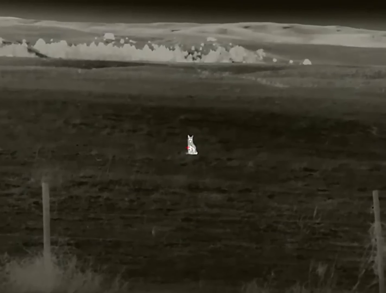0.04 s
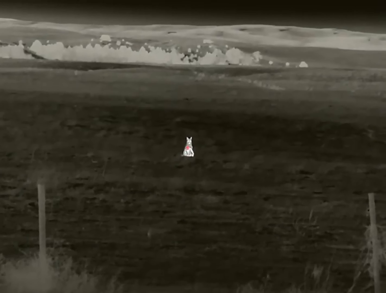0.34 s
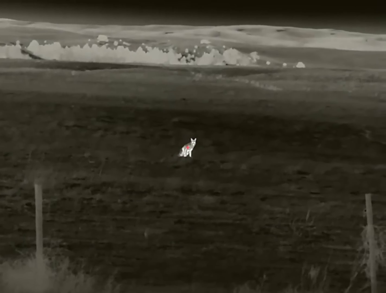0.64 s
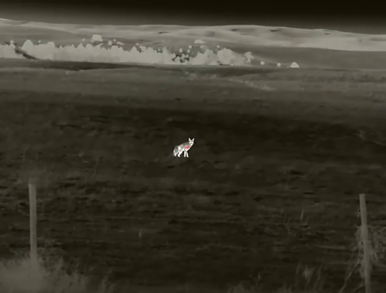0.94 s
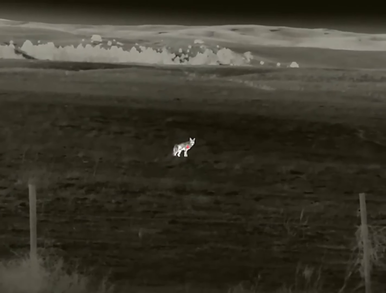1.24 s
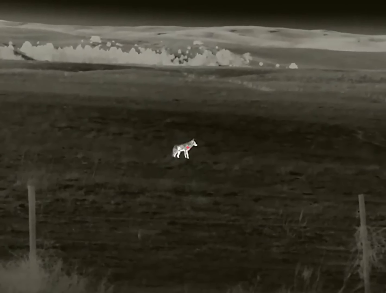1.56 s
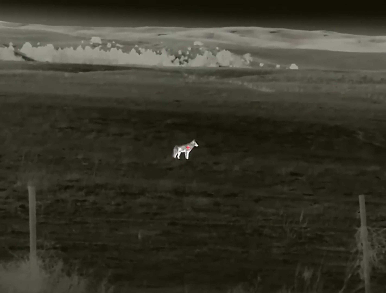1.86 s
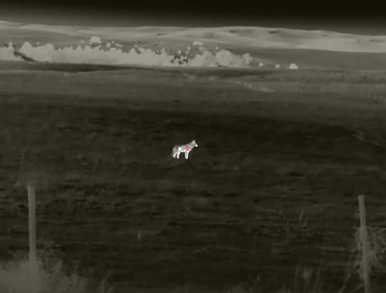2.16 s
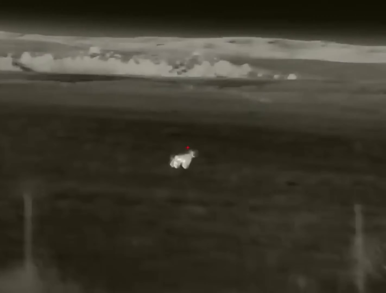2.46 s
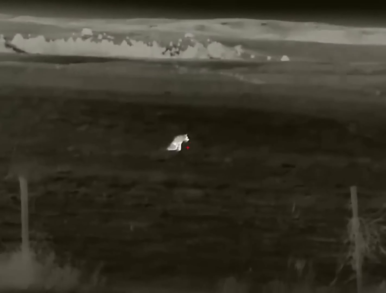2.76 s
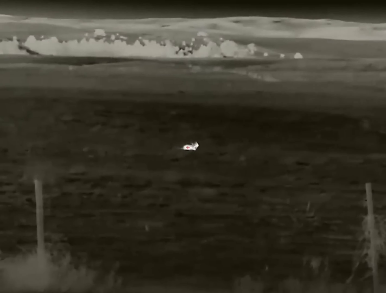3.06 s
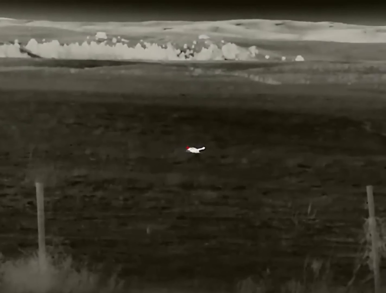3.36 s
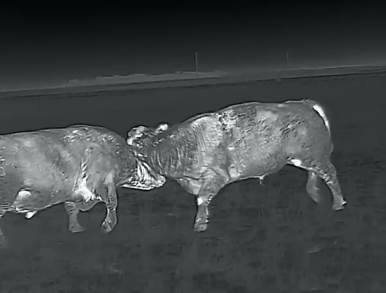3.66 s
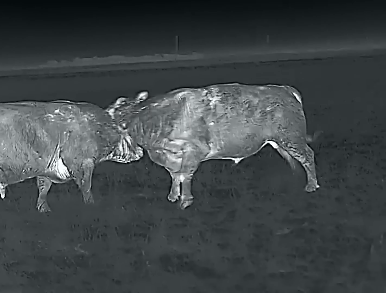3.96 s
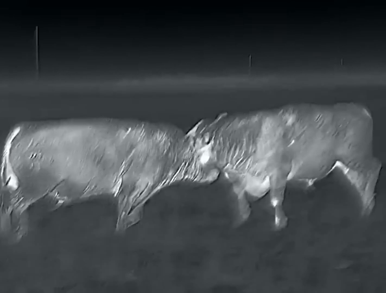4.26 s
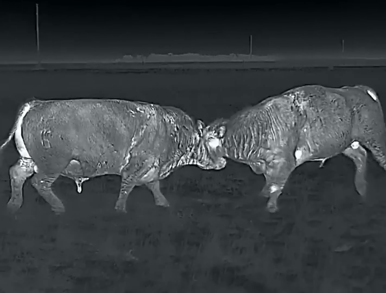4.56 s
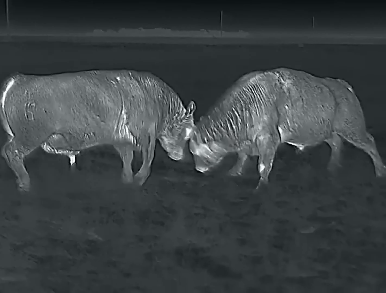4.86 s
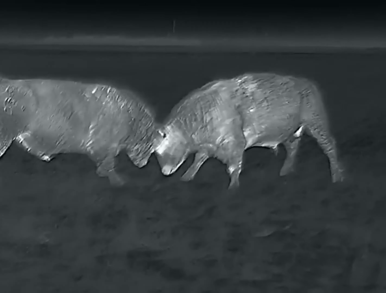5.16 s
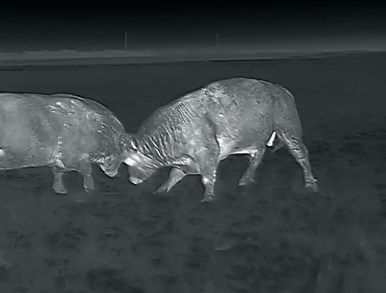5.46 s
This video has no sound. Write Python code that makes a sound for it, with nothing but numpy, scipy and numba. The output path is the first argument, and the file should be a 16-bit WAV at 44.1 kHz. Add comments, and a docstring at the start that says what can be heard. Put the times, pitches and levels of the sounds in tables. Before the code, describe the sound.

Faint crickets in a field, one loud rifle crack with a quieter second smack, then a bull bellowing in a long climbing call.

```python
"""Crickets chirr and a lone insect ticks over the low rumble of open farmland at night.
A rifle fires close by, a thud and a burst of gas, and its report rolls over the field. A third of a
second later the smack of the bullet comes back, with a few echoes. Grass rustles, a thin hiss comes up
and a bull bellows, its vocal folds pulsing through the resonances of its throat: a long rising call
that turns hoarse, breaks into a high hoot and climbs again. An insect trills briefly behind it."""
import sys
import numpy as np
from scipy import signal
from scipy.fft import rfft, irfft
from scipy.io import wavfile
from scipy.ndimage import uniform_filter1d, map_coordinates
from numba import njit

SR = 44100
rng = np.random.default_rng(int(sys.argv[2]) if len(sys.argv) > 2 else 0)


def wav_out(sig):
    """Save sig, one row per channel (or a flat mono array), as 16-bit PCM at SR to the path in sys.argv[1]."""
    wavfile.write(sys.argv[1], SR, np.round(np.clip(np.atleast_2d(sig).T, -1, 1) * 32767).astype(np.int16))


N = 247401
T = np.arange(N) / SR
SHOT_S, SMACK_S = 2.4112, 2.7267


def undb(db):
    return 10 ** (np.asarray(db) / 20)


def unit(x):
    """Scale to rms 1."""
    return x / np.sqrt(np.mean(x ** 2) + 1e-20)


def curves(table):
    """Each column of a breakpoint table as an automation curve."""
    s, *columns = np.transpose(table)
    return [np.interp(T, s, c) for c in columns]


def gate(start, end, rise, fall):
    """1 from start to end, with a ramp before and after."""
    return np.clip(1 + np.minimum((T - start) / rise, (end - T) / fall), 0, 1)


def sounding(table):
    """A gate held open over the table's time span."""
    return gate(table[0][0], table[-1][0], rise=.022, fall=.022)


def since(start):
    """Seconds gone by since start, 0 before it."""
    return np.maximum(T - start, 0)


def decay(start, t60, hold=0):
    """Silent until start, level during hold, then dying away."""
    return (T >= start) * np.exp(-np.log(1000) * since(start + hold) / t60)


def swell(peak, width):
    """A bell-shaped fade in and out."""
    return np.exp(-.5 * ((T - peak) / width) ** 2)


def walk(rate):
    """Smooth random modulation with rms 1, changing about rate times a second."""
    count = int(N / SR * rate) + 4
    return unit(map_coordinates(rng.standard_normal(count), [T * rate + 1], order=2))


def butter(x, hz, kind):
    return signal.sosfilt(signal.butter(2, hz, kind, fs=SR, output="sos"), x)


def colour(x, points, size=8192):
    """Minimum-phase EQ through points of (frequency [Hz], gain [dB])."""
    hz, db = np.transpose(points)
    bins_hz = np.fft.rfftfreq(size, 1 / SR)
    log_gain = np.log(undb(np.interp(np.log(bins_hz + 1), np.log(hz), db)))
    cepstrum = irfft(log_gain)[:size // 2]
    cepstrum[1:] *= 2
    response = irfft(np.exp(rfft(cepstrum, size)))[:size // 2]
    return signal.fftconvolve(x, response)[:N]


def wide(points, side_db, envelope=1):
    """Mid/side stereo noise, enveloped and then coloured by an EQ scaled to unity power."""
    mid_noise, side_noise = rng.standard_normal((2, N))
    gain = 1 / np.sqrt(np.sum(colour(signal.unit_impulse(N), points) ** 2))
    side = undb(side_db) * colour(side_noise * envelope, points)
    return gain * (colour(mid_noise * envelope, points) + np.array([side, -side]))


# cricket beds: (start [s], end [s], centre [Hz], half-width [Hz], level [dB])
CRICKET_BANDS = [(0, 3.95, 2095, 240.4, -67), (0, 3.1, 2600, 260.2, -86.5), (0, 3.97, 5290, 340, -77.5)]


def crickets():
    """Many crickets blend into narrow shimmering bands."""
    out = 0
    for start, end, hz, width, db in CRICKET_BANDS:
        steps = (-4, -2, -1, -.5, 0, .5, 1, 2, 4)
        band = [(hz + width * k, -min(12 * k * k, 20 * abs(k))) for k in steps]
        chirr = wide(band, side_db=-12) * undb(db + .3985 * walk(30))
        out += chirr * gate(start, end, rise=.13, fall=.04)
    return out


# bright ring of a tick: (frequency [Hz], gain [dB])
TICK_EQ = [(5500, -40), (7500, -13), (8800, -1.5), (10500, -3), (12000, -17), (15000, -26)]


def ticking_insect():
    """A lone insect speeds up to about six ticks a second, then fades under the bull."""
    gaps_s = np.maximum(.216 - .0047 * np.arange(20), .156)
    ticks = sum(decay(s, t60=.005) + .16 * decay(s, t60=.088) for s in np.cumsum([.146, *gaps_s]))
    return wide(TICK_EQ, side_db=-4, envelope=ticks * undb(-65 - 28 * since(3.28)))


# bass-heavy night ambience: (frequency [Hz], gain [dB])
NIGHT_EQ = [(25, -23), (55, -11), (90, -6), (120, 3.5), (165, -7.5), (300, -12.5), (650, -14.5),
            (1400, -24), (2700, -24.5), (3600, -29), (4500, -23), (6000, -31), (7500, -37.5), (15000, -42)]


def night_air():
    """A low far-off rumble over the field, barely wavering."""
    return wide(NIGHT_EQ, side_db=-10) * undb(-71 + .38 * walk(6.6))


def crack(start, hz, t60):
    """A pressure swing that builds within a cycle and rings out within a few."""
    cycles = hz * since(start)
    return np.sin(2 * np.pi * cycles) * (1 - np.exp(-cycles / .12)) * decay(start, t60)


# full-range muzzle blast: (frequency [Hz], gain [dB])
BLAST_EQ = [(30, -10.5), (100, -0.5), (200, -6), (370, 0.5), (520, -2.5), (750, -9), (1100, -6), (1600, -3),
            (2600, -3.5), (3500, -0.5), (6500, 0), (10000, -3.5), (13000, -0.5), (15500, -8)]


def rifle():
    """A thud and a burst of muzzle gas whose bass dies first; it reaches the left ear a moment early."""
    attack = np.minimum(since(SHOT_S) / .0008, 1)
    treble = wide(BLAST_EQ, side_db=-2.5, envelope=attack * decay(SHOT_S, t60=.14, hold=.018))
    treble = butter(butter(treble, 420, "high"), 420, "high")
    bass = wide(BLAST_EQ, side_db=-5.5, envelope=attack * decay(SHOT_S, t60=.046, hold=.014))
    gas = undb(-7) * treble + undb(-1.5) * butter(bass, 670, "low")
    thud = undb(-18.5) * crack(SHOT_S + .001, hz=104, t60=.04994)
    left, right = butter(gas + thud, 40, "high")
    pan_db, lag_samples = 2.1, 3
    return np.array([left * undb(pan_db / 2), np.roll(right, lag_samples) * undb(-pan_db / 2)])


# bright tail of the report: (frequency [Hz], gain [dB])
FIELD_EQ = [(40, -23.5), (160, -13.5), (500, -23), (1400, -8.5), (2200, -4), (3700, -5.5), (5200, -0.5),
            (8000, -11), (15000, -29)]
# low end of the report, back from the hills: (frequency [Hz], gain [dB])
HILLS_EQ = [(30, -19.5), (70, -3.5), (200, 0), (300, -10.5), (500, -21.5), (2000, -45)]
# returns from the hills: (time [s], level [dB], t60 [s])
HILL_RETURNS = [(2.45, -66, 7), (2.859, -60.5, 0.53), (3.07, -66, 0.46)]


def rolling_report():
    """Near ground, open field and far hills scatter the report back, duller from further away."""
    start = SHOT_S + .0078
    field_edge_s = 2.85  # the tail dies faster from here
    ground = undb(-28) * decay(start, t60=.4)
    field = undb(-45) * decay(start, t60=2.3) * decay(start, t60=.73, hold=field_edge_s - start)
    bright = wide(FIELD_EQ, side_db=-9, envelope=np.hypot(ground, field))
    dull = signal.sosfiltfilt(signal.butter(2, 6000, fs=SR, output="sos"), bright)
    far = np.minimum(since(SHOT_S) / .54, 1) ** 2
    returns = sum(undb(db) * decay(s, t60) for s, db, t60 in HILL_RETURNS)
    hills = wide(HILLS_EQ, side_db=-10.5, envelope=returns)
    return (1 - far) * bright + far * dull + hills


# midrange bite of the smack's noise and its echoes: (frequency [Hz], gain [dB])
SMACK_EQ = [(100, -15), (400, -17), (800, -7.5), (1400, 0), (2600, -1), (4000, -10.5), (6500, -28),
            (10000, -32), (15000, -52)]


def bullet():
    """The bullet lands with a sharp smack, a hollow thump and a spray of noise."""
    smack = undb(-9.5) * crack(SMACK_S, hz=1710, t60=.0047)
    smack += undb(-15) * crack(SMACK_S, hz=3700, t60=.0022)
    thump = undb(-15.5) * crack(SMACK_S + .0016, hz=182, t60=.024)
    spray = wide(SMACK_EQ, side_db=-3.5, envelope=undb(-31) * decay(SMACK_S, t60=.032))
    return butter(butter(smack, 7900, "low") + thump, 95, "high") + spray


# slapbacks of the smack: (time [s], level [dB], low-pass cutoff [Hz])
SLAPBACKS = [(2.7429, -30.5, 9000), (2.7945, -35, 9000), (2.8237, -39, 9000), (2.827, -33.5, 12000),
             (2.8534, -36, 1900), (3.036, -48, 2000), (3.062, -53.5, 4000)]


def bullet_echoes():
    """The smack comes back in short bursts, each with a diffuse tail, and they blur into a wash."""
    out = wide(SMACK_EQ, side_db=-4, envelope=undb(-48.5) * swell(2.845, width=.026))  # the wash
    for s, db, cutoff_hz in SLAPBACKS:
        burst = decay(s, t60=.02) + undb(-14.5) * decay(s, t60=.39)
        out += undb(db) * butter(wide(SMACK_EQ, side_db=-3, envelope=burst), cutoff_hz, "low")
    return out


# airy top layer: (frequency [Hz], gain [dB])
HISS_EQ = [(1400, -22), (2400, -1), (3000, -4.5), (3500, -10.5), (4300, -9), (5500, -12), (7600, -15.5),
           (10500, -17.5), (13500, -16), (15500, -29)]


def hiss():
    """A thin hiss fades in just ahead of the bull and creeps up in level."""
    start = 2.95
    bed = wide(HISS_EQ, side_db=-5.5) * undb(-74 + 1.9 * since(start))
    return bed * gate(start, T[-1], rise=.11, fall=1)


# crisp sheen of the grass: (frequency [Hz], gain [dB])
GRASS_EQ = [(4000, -31), (7500, -11), (9000, -2), (11500, 0), (13500, -7.5), (15500, -22)]
# brief rustles: (time [s], level [dB], width [s])
SWISHES = [(2.991, -72, 0.013), (3.05, -75.5, .03), (4.491, -78, 0.032)]


def grass():
    """A few soft swishes, each swelling and fading."""
    swishes = sum(undb(db) * swell(s, width) for s, db, width in SWISHES)
    return wide(GRASS_EQ, side_db=-4, envelope=swishes)


# air rushing through the throat: (frequency [Hz], gain [dB])
RASP_EQ = [(60, -30.5), (130, -4.5), (300, 6), (550, 4.5), (750, 2.5), (1150, 2.5), (1420, -4),
           (1650, -6.5), (2000, -12), (2600, -29.5), (3000, -18.5), (3600, -35), (7700, -28), (9000, -46.5)]


def vocal_folds(hz, rough, jitter, shimmer):
    """One pulse and one puff of air a cycle; roughness unsettles the timing and size of the pulses."""
    rough = np.clip(rough, 0, 1)
    cycles = np.cumsum(hz * (1 + jitter * (rough + .035) * walk(140))) / SR
    at = np.interp(np.arange(1, int(cycles[-1]) + 1), cycles, np.arange(N))
    index = np.minimum(at.astype(int), N - 2)
    size = np.sqrt(SR / hz[index]) * (1 + shimmer * rough[index] * rng.standard_normal(N)[:len(at)])
    pulses = np.zeros(N)
    pulses[index], pulses[index + 1] = size * (1 - at % 1), size * (at % 1)  # split over two samples
    puffs = np.exp(-(cycles % 1)) * rng.standard_normal(N)
    return pulses, rough * unit(colour(puffs, RASP_EQ))


def roughness(spells, clear=.09):
    """A clear voice that turns hoarse in spells."""
    return clear + sum(amount * gate(s, s, rise, fall) for s, rise, fall, amount in spells)


def even(sound):
    """Ride the rms to 1, whichever overtones fall on the throat's resonances."""
    return sound / np.sqrt(np.abs(uniform_filter1d(sound ** 2, SR // 20)) + 1e-12)


# pitch curve of the bellow: (time [s], pitch [Hz])
BELLOW_PITCH = [(3.25, 79.55), (3.524, 101), (3.656, 111.3), (3.722, 112.5), (3.968, 127.9), (4.224, 133.7),
                (4.688, 134.2), (4.854, 137.4), (4.95, 128.1)]
# its volume curve: (time [s], level [dB])
BELLOW_LEVEL = [(3.24, -67), (3.42, -55), (3.616, -52), (3.654, -46), (3.948, -38.5), (4.258, -39),
                (4.43, -36), (4.854, -37.5), (4.95, -42.5)]
# its hoarse spells: (peak time [s], rise [s], fall [s], added roughness [0-1])
BELLOW_GRIT = [(3.25, .05, 0.68, 0.24), (3.9, 0.076, 0.66, 0.55), (4.95, 0.26, .1, 0.55)]
# formants with the mouth shut, half open and wide: (frequency [Hz], gain [dB])
SHUT_EQ = [(60, -39), (100, -8), (190, 4), (300, 0.5), (480, 5.5), (650, -4), (850, -10), (1000, 3.5),
           (1200, -9), (1450, 3.5), (1650, -23), (2500, -35), (5000, -48)]
HALF_OPEN_EQ = [(70, -40), (115, -12), (230, -7), (350, -1), (470, 4.5), (580, -12), (930, -12.5),
                (1200, -12), (1380, -33), (1630, -5.5), (1780, -28), (2600, -48), (3000, -34), (3600, -51)]
OPEN_EQ = [(70, -39), (132, -11), (265, -5.5), (400, -4.5), (535, 5), (660, -17), (800, -10), (940, -24.5),
           (1200, -15), (1380, -23.5), (1610, -19), (1750, -31), (1880, -29.5), (2200, -34), (2500, -47)]


def bellow():
    """The long call: the mouth passes from shut through half open to wide as the pitch rises."""
    hz, = curves(BELLOW_PITCH)
    db, = curves(BELLOW_LEVEL)
    shut_hz, open_hz, jaw_share = 91, 136.1, .19
    jaw_drop = gate(3.655, T[-1], rise=.043, fall=1)  # part of the opening comes at once
    gradual = (hz - shut_hz) / (open_hz - shut_hz)
    opening = np.clip((1 - jaw_share) * gradual + jaw_share * jaw_drop, 0, 1)
    pulses, rasp = vocal_folds(hz, roughness(BELLOW_GRIT), jitter=.015, shimmer=.2)
    shapes = (0, SHUT_EQ), (.5, HALF_OPEN_EQ), (1, OPEN_EQ)
    voice = sum(np.maximum(1 - 2 * abs(opening - at), 0) * colour(pulses, eq) for at, eq in shapes)
    voice = even(butter(voice, 3500, "low")) + undb(-5) * rasp
    return voice * undb(db) * sounding(BELLOW_PITCH)


def register(hz, rough, throat, jitter, shimmer, rasp_db):
    """One stretch of the call through a throat that holds its shape."""
    pulses, rasp = vocal_folds(hz, rough, jitter, shimmer)
    return even(colour(pulses, throat)) + undb(rasp_db) * rasp


# dark formants of the breaking voice: (frequency [Hz], gain [dB])
BREAK_EQ = [(55, -45), (95, -9.5), (150, -13), (210, 1.5), (290, 5.5), (380, -12), (480, -10), (700, -32),
            (950, -13), (1300, -40.5), (2000, -36), (5000, -57.5)]


def voice_break():
    """A second vibration of the folds starts under the bellow, swoops up ever faster and takes over."""
    start_s, loudest_s, top_s, end_s = 4.72, 5.01, 5.04, 5.17
    low_hz, high_hz = 83.1, 144.6
    progress = np.minimum(since(start_s) / (top_s - start_s), 1)
    hz = low_hz + (high_hz - low_hz) * progress ** 2.6
    db = -38.5 + np.minimum(66 * (T - loudest_s), 115 * (loudest_s - T))  # swell, then a faster fade
    voice = register(hz, np.full(N, .31), BREAK_EQ, jitter=.03, shimmer=.4, rasp_db=-5)
    return voice * undb(db) * gate(start_s, end_s, rise=.02, fall=.02)


# narrow band of the insect trill: (frequency [Hz], gain [dB])
TRILL_EQ = [(3400, -40), (3880, -14), (4080, 0), (4280, 0), (4430, -13), (5000, -40)]


def insect_trill():
    """A thin, high, fluttering insect trill sounds briefly in the background."""
    band = unit(colour(rng.standard_normal(N), TRILL_EQ))
    flutter = 1 + .33 * np.sin(2 * np.pi * 47.8 * T)
    return undb(-70.5) * band * flutter * gate(4.96, 5.195, rise=.096, fall=.06)


# pitch curve of the hoot: (time [s], pitch [Hz])
HOOT_CURVE = [(5.07, 233.2), (5.17, 254), (5.25, 276.3), (5.32, 264.8), (5.5, 262.3)]
# its round, hollow formants: (frequency [Hz], gain [dB])
HOOT_EQ = [(120, -44), (200, 3), (260, 4.5), (330, 8), (400, -5), (500, -9), (650, -59), (800, -20),
           (1100, -20.5), (1600, -36), (2300, -32), (5000, -78)]


def hoot():
    """The voice flips up an octave, locks into a clean tone for a moment, then frays and tires."""
    hz, = curves(HOOT_CURVE)
    clean = gate(5.175, 5.26, rise=.021, fall=.046)
    rough = .43 * (1 - clean)
    voice = register(hz, rough, HOOT_EQ, jitter=.035, shimmer=.9, rasp_db=-13)
    tiring_db = 26 * since(5.31)
    falter_db = 11 * rough * np.maximum(walk(70), 0)
    return voice * undb(-35.5 - tiring_db - falter_db) * gate(5.09, 5.49, rise=.04, fall=.061)


@njit
def resonance(x, hz, width):
    """Swept band-pass with unity gain at its centre."""
    y, band, low = np.empty(len(x)), 0., 0.
    for i in range(len(x)):
        g, k = np.tan(np.pi * hz[i] / SR), width / hz[i]
        v = (band + g * (x[i] + 1e-18 - low)) / (1 + g * (g + k))
        band, low, y[i] = 2 * v - band, low + 2 * g * v, k * v
    return y


# pitch curve of the last climb: (time [s], pitch [Hz])
CLIMB_CURVE = [(5.17, 101), (5.25, 112.9), (5.36, 139), (5.5, 151.5), (5.61, 163.5)]
# its hoarse spell: (peak time [s], rise [s], fall [s], added roughness [0-1])
CLIMB_GRIT = [(5.42, .22, 0.17, 0.5)]
# its brassy formants: (frequency [Hz], gain [dB])
CLIMB_EQ = [(150, -48), (300, -11), (480, -7), (640, -1), (790, -2.5), (960, -10), (1100, -10),
            (1280, -4.5), (1550, 1), (1850, -21.5), (2200, -12.5), (3500, -40), (8000, -38)]


def climb():
    """The last call, its loudness and first resonance sliding up with the pitch."""
    hz, = curves(CLIMB_CURVE)
    db = -45.5 + 25 * np.log2(hz / hz.max())
    mouth_hz, width_hz = np.minimum(4.9 * hz, 705), 170.
    pulses, rasp = vocal_folds(hz, roughness(CLIMB_GRIT), jitter=.018, shimmer=.45)
    mouth = resonance(resonance(pulses, mouth_hz, width_hz), mouth_hz, width_hz)
    voice = even(undb(6) * mouth + colour(pulses, CLIMB_EQ))
    return (voice + undb(-1) * rasp) * undb(db) * sounding(CLIMB_CURVE)


def scene():
    """The gunshot, then the bull straight ahead, over the night ambience."""
    gunshot = rifle() + rolling_report() + bullet() + bullet_echoes()
    bull = bellow() + voice_break() + hoot() + climb()
    ambience = insect_trill() + crickets() + ticking_insect() + grass() + night_air() + hiss()
    return gunshot + bull + ambience


def record(dry):
    """The shot overloads the recorder and clips; a steep low-pass cuts the top."""
    high_cut = signal.ellip(10, .2, 70, 15800, fs=SR, output="sos")
    return signal.sosfilt(high_cut, np.clip(dry, -.95, .95))


dry = scene()
out = record(dry)
wav_out(out)
```